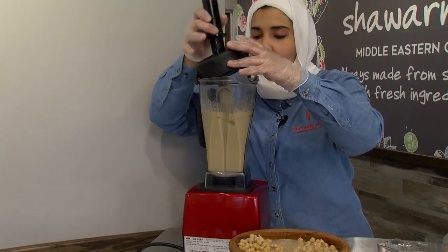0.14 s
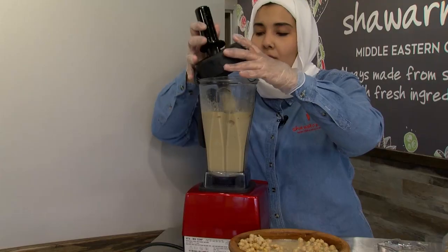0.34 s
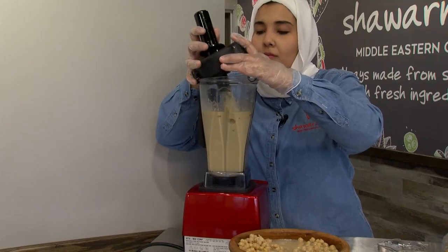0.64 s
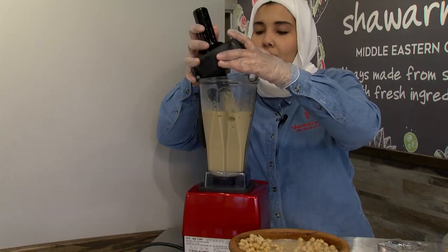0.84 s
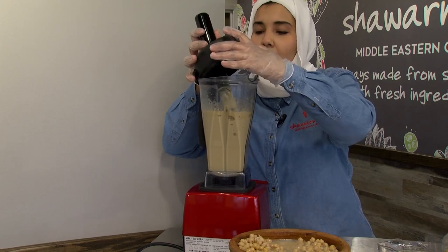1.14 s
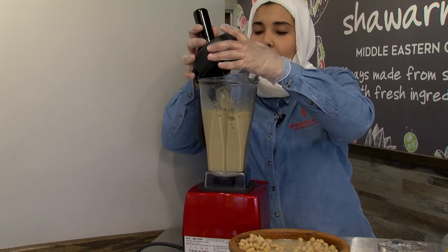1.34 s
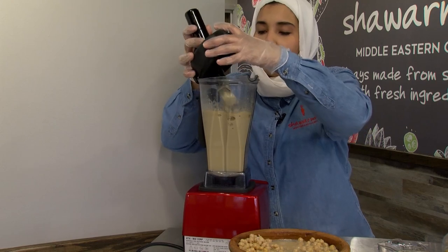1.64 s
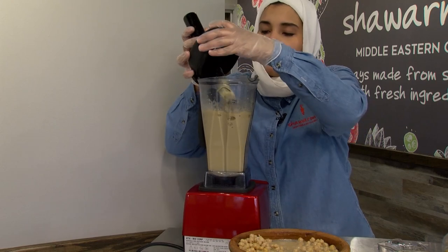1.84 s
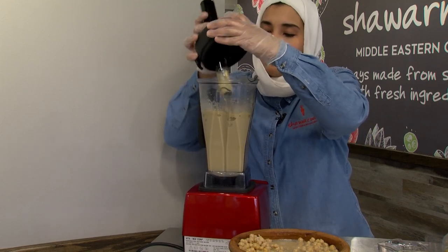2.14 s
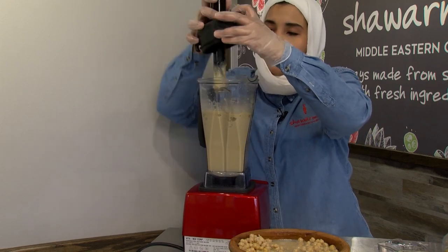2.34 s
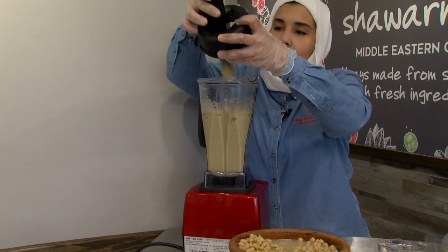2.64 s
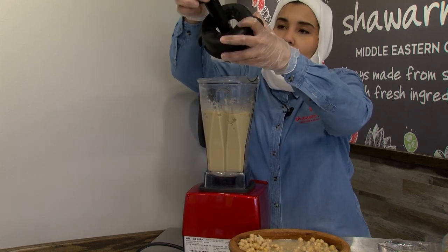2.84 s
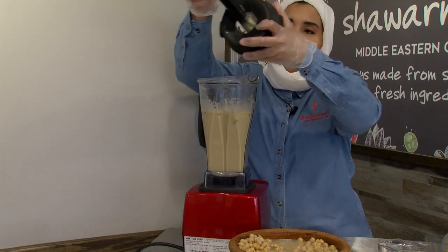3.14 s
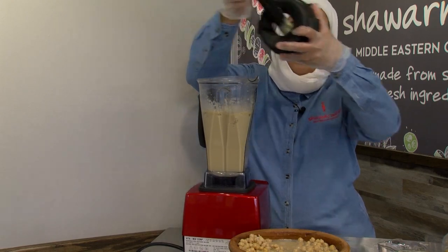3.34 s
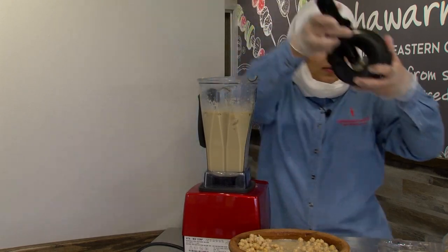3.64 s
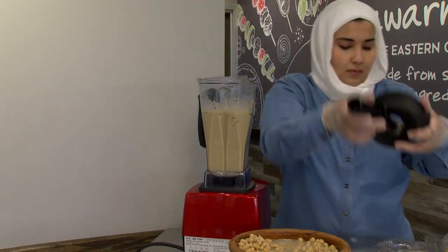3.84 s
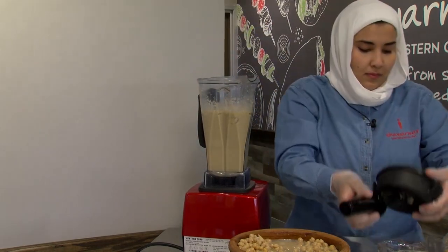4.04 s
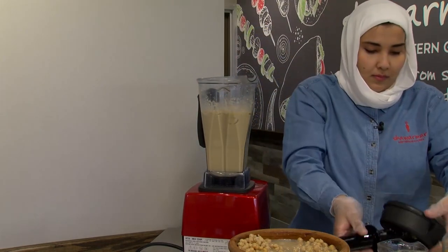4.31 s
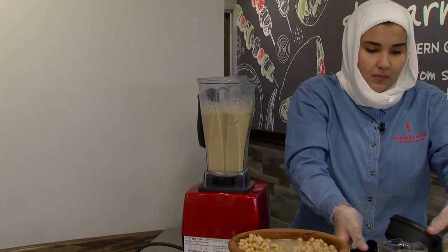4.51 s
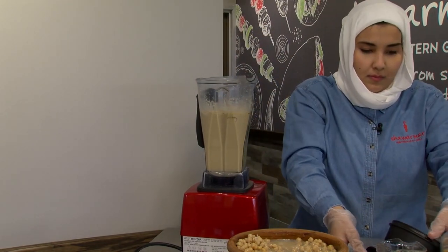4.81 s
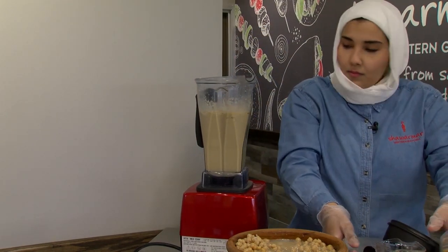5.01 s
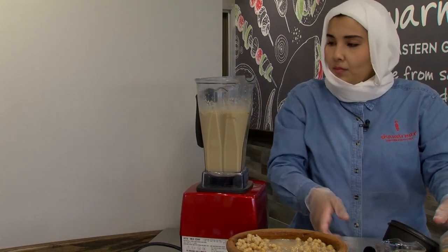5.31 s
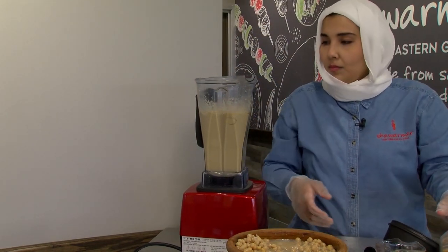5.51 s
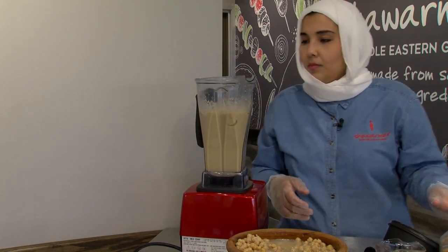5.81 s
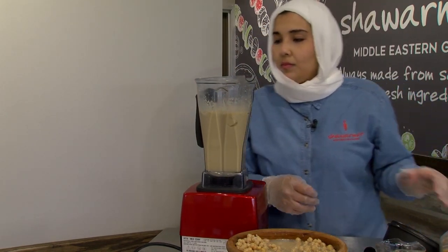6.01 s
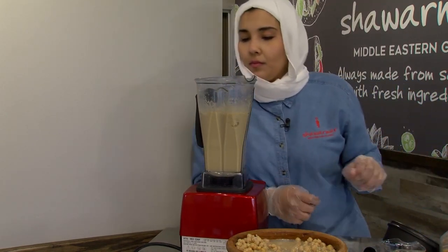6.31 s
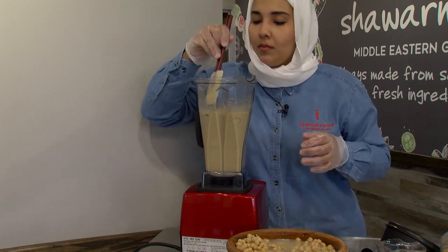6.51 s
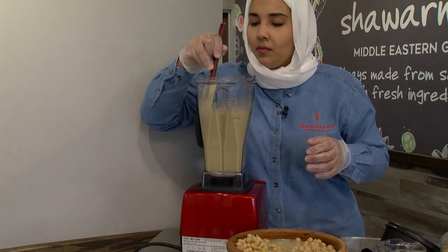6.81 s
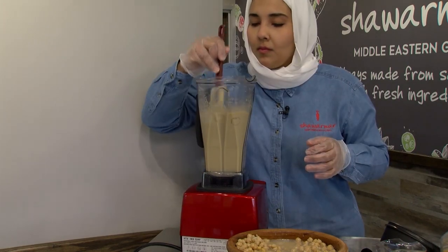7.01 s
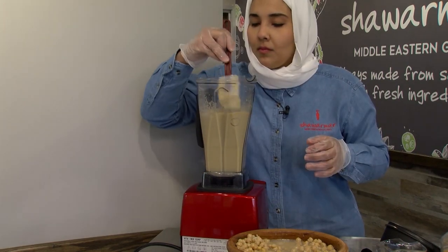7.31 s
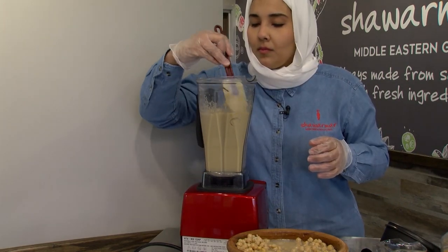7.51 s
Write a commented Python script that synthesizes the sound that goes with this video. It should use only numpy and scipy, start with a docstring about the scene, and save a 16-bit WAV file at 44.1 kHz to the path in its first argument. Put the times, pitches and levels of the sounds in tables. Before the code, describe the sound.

A powerful countertop blender whines steadily while thick paste churns and hisses; the lid comes off and a spatula dips in.

```python
"""In a kitchen, a countertop blender runs at steady speed; its lid is lifted off and a spatula dips in.
The four-winged blade sings at four times the shaft speed, made of sines that waver.
The churning paste is shaped noise: it hisses in surges and makes the air above it ring, higher with the lid off.
The base rumbles, the jar gives hollow notes, and there are a few ticks and soft thumps.
All is heard by a small microphone on a moving chest."""
import sys
import numpy as np
from scipy import signal
from scipy.fft import rfft, irfft
from scipy.io import wavfile

SR = 44100
rng = np.random.default_rng(int(sys.argv[2]) if len(sys.argv) > 2 else 0)


def persist_wave(psi):
    """Save psi, clipped to +-1, as 16-bit WAV."""
    counts = np.round(np.clip(psi, -1, 1) * 32767).astype(np.int16)
    wavfile.write(sys.argv[1], SR, np.atleast_2d(counts).T)


N = 337788

# Settings with four values mean: lid on, lid off, spatula in, spatula deep.
# Levels "over the churn" are added to the churn level. Drift rates are the corners of its low-passes.

# the hands: lid starts to tilt, is clear of the jar; spatula enters, is in [s]
LID_LIFT_S, SPATULA_IN_S = (1.57, 2.8), (6.4, 6.65)
SPATULA_DIP_S = (6.93, 7.1, 7.2, 7.45)   # it reaches down once: sets off, arrives, turns back, is up again

# how far the microphone is turned to the motor base: (time [s], share [0-1])
FACING_BY_TIME = [(0, .35), (1.1, 0.31), (1.6, 0.17), (2.0, 0.05), (2.6, 0.4), (3.35, 0.36), (3.7, 0.7),
                  (4.4, 0.72), (5.0, 0.9), (5.65, 0.64), (5.85, 0.8), (6.4, 0.63), (6.8, 0.33),
                  (7.66, 0.55)]
MIC_HISS_DB, CUTOFF_HZ = -63, 15730

# rumble of the base: (frequency [Hz], relative level [dB per Hz])
DEEP_SPECTRUM = [(12, -18), (20, 10), (38, 4.5), (60, 0), (85, -11.5), (110, -29.5)]
# growl of the base: (frequency [Hz], relative level [dB per Hz])
GROWL_SPECTRUM = [(80, -19.5), (130, -20), (210, -5), (260, -10.5), (310, 1), (420, -2), (520, -25)]
# rows deep, lower boom, upper boom, growl, with the microphone turned away; growl is before its lift:
# (lid on [dB], lid off [dB], spatula in [dB], spatula deep [dB])
RUMBLE_LEVELS = [(-52.5, -54, -51.5, -59), (-57.5, -54.5, -53.5, -59.5), (-47.5, -59.5, -42.5, -46.5),
                 (-44.5, -44, -43, -45.5)]
RUMBLE_FACING_DB = (11, 11.5, 5.2, 5.5)   # change when fully turned, same four layers
RUMBLE_WAVER_DB = (1.2, 1.7, 3.4, 2.4)    # random waver, same four layers
GROWL_LIFT_DB = 5.5
BOOM_HZ, BOOM_WIDTH_HZ = (119.2, 139.7), 16

# hollow notes of the jar, before a shared cut: (time [s], low note [dB], high note [dB])
HOLLOW_LEVELS = [(0, -20, -42), (.6, -11.5, -40), (.95, -16.5, -46), (1.3, -17, -41), (2.05, -20, -42),
                 (2.4, -20.5, -16.5), (2.9, -21, -25), (3.6, -25.5, -42), (4.8, -28, -44),
                 (5.5, -25.5, -31), (6.4, -27, -23.5), (7.0, -24, -25.5), (7.66, -24.5, -24)]
HOLLOW_HZ, HOLLOW_WIDTH_HZ = (524.9, 808), (43.7, 280)
HOLLOW_CUT_DB, HOLLOW_WAVER_DB = 5.5, 1

# soft low thumps: (time [s], peak level [dB])
THUMP_EVENTS = [(2.622, -27), (6.57, -33)]
# hard ticks: (time [s], level before the band filter [dB], lowest frequency [Hz], highest frequency [Hz])
TICK_EVENTS = [(4.1955, -20, 3000, 12000), (7.0655, -21, 1800, 10000), (7.0715, -20, 1800, 10000),
               (7.087, -23, 1800, 10000), (7.0905, -25, 1800, 10000)]

# droplets flung at the wall: (frequency [Hz], relative level [dB per Hz])
SPATTER_SPECTRUM = [(1500, -20.5), (3000, -2.5), (8000, -8.5), (12000, -5.5), (16500, -15.5)]
SPATTER_PER_S, SPATTER_DB = 180, (-26.5, -28.5, -32, -29)   # average count; level over the churn

# fine bright spray: (frequency [Hz], relative level [dB per Hz])
SPRAY_SPECTRUM = [(2000, -18), (4000, -5), (5500, -7), (7500, -11), (9000, -17.5), (11000, -21),
                  (13000, -26.5), (14500, -29.5), (16500, -36.5)]
# the treble as the microphone turns:
# (time [s], spray over the churn [dB], sheen centre [Hz], sheen width [Hz], sheen over the churn [dB])
TREBLE_BY_TIME = [(0, -8, 9030, 4040, -23.5), (1.8, -9, 8930, 3930, -23.5), (2.5, -9.5, 8700, 4000, -27),
                  (3.45, -9, 8730, 4030, -26), (3.7, -7.5, 11200, 4920, -20), (3.9, -10, 9860, 3950, -28),
                  (4.1, -7, 10800, 4030, -23), (5.1, -6.5, 11000, 4000, -25), (5.8, -6, 9900, 3100, -24),
                  (6.3, -8, 9470, 2560, -34.5), (6.6, -9.5, 8950, 2010, -31.5),
                  (7.66, -11, 8920, 1980, -27)]

# rings of the air column: levels over the churn, the first one before its low cut
FIRST_HZ, FIRST_DB = (527, 714, 680, 676), (11.8, 13.64, 18.3, 15.2)
COLUMN_WIDTH_HZ, COLUMN_CUT_HZ = 295, 479
OVERTONE_HZ, OVERTONE_WIDTH_HZ = (1564, 1715, 1690, 1448), (288, 191, 169, 150)
UPPER_LOW_HZ, UPPER_LOW_DB = (2020, 2487, 2440, 2500), (-21, -6, -15.5, -15)
UPPER_HIGH_HZ, UPPER_HIGH_DB = (2590, 2900, 4400, 4350), (-11.5, -16, -8.5, -11.5)
UPPER_WIDTH_HZ = (540, 1050)
# the column's overtone: (time [s], level over the churn [dB])
OVERTONE_LEVELS = [(0, 10), (1.5, 8), (2.3, 2), (2.6, -5.5), (3, -8), (3.5, 1), (4.4, -2), (5.2, 1.5),
                   (6.35, 3), (6.7, -1.5), (7.15, 5.5), (7.66, 1.5)]

# paste surging round the vortex, before quick random surges: (time [s], churn level [dB])
CHURN_LEVELS = [(0.0, -31.5), (0.62, -30.5), (1.56, -29), (1.58, -32.5), (2.13, -31.5), (2.2, -33),
                (2.37, -31), (2.52, -34.5), (2.88, -33), (2.94, -37.5), (3.18, -32), (3.26, -35),
                (3.86, -31), (3.9, -35.5), (3.97, -32), (4.78, -29.5), (4.8, -33.5), (4.91, -32),
                (5.01, -28.5), (5.35, -33.5), (5.55, -30.5), (5.61, -35), (5.76, -31.5), (6.38, -31.5),
                (6.74, -36), (6.76, -35), (7.57, -36.5), (7.66, -37)]
SURGE_DB, SURGE_RATE_HZ = 0.71, 5.1   # spread and drift rate of the quick surges
# hiss of the paste: (frequency [Hz], relative level [dB per Hz])
PASTE_SPECTRUM = [(300, -32), (450, -5), (520, 6.5), (1100, 0.5), (1400, -3), (2000, -5.5), (3000, -12.5),
                  (4500, -25.5), (7000, -58)]
HISS_DB = 8.5   # over the churn

# shaft speed before its random flutter: (time [s], speed [turns per s])
SHAFT_SPEED = [(0, 168.0), (.5, 168.9), (1.25, 167.8), (1.5, 168.3), (1.75, 167.7), (2.0, 168.4),
               (2.5, 168.7), (2.8, 170.4), (4.0, 171.1), (4.25, 169.6), (4.5, 170.8), (5.25, 171.9),
               (5.75, 171.9), (6.25, 170.0), (6.6, 169.0), (7.0, 168.8), (7.66, 167.6)]
FLUTTER_TURNS_PER_S, FLUTTER_RATE_HZ = 0.42, 9.4
# blade tone, four times the shaft speed, before waver: (time [s], level [dB])
BLADE_LEVELS = [(0.0, -10), (0.08, -16), (0.15, -10.5), (0.59, -14.5), (0.85, -11), (2.15, -11),
                (2.18, -14.5), (2.43, -8), (2.52, -14), (2.67, -9), (2.73, -14.5), (2.9, -10), (2.96, -15),
                (3.11, -12.5), (3.52, -12), (3.58, -15.5), (3.67, -11.5), (4.82, -12), (4.84, -17.5),
                (5.08, -10), (5.35, -11.5), (5.57, -11), (5.61, -15), (5.76, -11.5), (6.55, -10.5),
                (6.61, -8), (7.64, -8.5), (7.66, -10)]
LUMP_DB, LUMP_RATE_HZ = (0.66, 1.77, .8, 0.68), 14.6   # the load on the blade comes and goes
# weaker even orders, before waver: (time [s], 2nd order [dB], 6th order [dB], 8th order [dB])
EVEN_ORDER_LEVELS = [(0, -40, -39, -48), (.13, -32.5, -27, -34), (.75, -29, -24, -35),
                     (1.2, -36.5, -28.5, -50), (1.85, -51, -28.5, -58), (2.05, -46, -25.5, -58),
                     (2.7, -40, -34, -61), (3.35, -37.5, -27, -39), (3.75, -30.5, -31.5, -43),
                     (4.0, -40.5, -30, -37), (4.8, -45.5, -39, -38), (5.0, -32, -30, -33),
                     (5.6, -49, -38, -51), (5.8, -30.5, -24.5, -51), (6.3, -30.5, -27, -31.5),
                     (6.5, -38, -32, -32.5), (6.8, -36.5, -30, -41.5), (7.25, -41, -27.5, -39),
                     (7.66, -41.5, -38, -54)]
# level turned away, change when fully turned [dB]
FIRST_ORDER_DB, FOURTEENTH_ORDER_DB = (-49, 20.5), (-54.5, 11.5)


def from_db(db):
    """Gain of a level in dB."""
    return 10 ** (np.asarray(db) / 20)


def rms_one(x):
    """Scale a sound to rms 1."""
    return x / np.sqrt(np.mean(x ** 2) + 1e-20)


def in_time(rows):
    """Join the points of each table column by straight lines, one value per sample."""
    s, *columns = np.transpose(rows)
    return [np.interp(np.arange(N) / SR, s, c) for c in columns]


def drift(rate_hz):
    """Slow chance: noise at every 20th sample through two equal one-pole low-passes; spread 1."""
    r = np.exp(-40 * np.pi * rate_hz / SR)
    noise = rng.standard_normal(N // 20 + 2002)
    slow = signal.lfilter([1], [1, -2 * r, r * r], noise)[2000:]   # drop the filter's start
    return np.interp(np.arange(N) / 20, np.arange(len(slow)), rms_one(slow - slow.mean()))


def coloured(x, spectrum):
    """Shape a sound by a table of frequencies and levels, next to nothing beyond its ends; rms 1."""
    hz, level_db = np.transpose(spectrum)
    bins_hz = np.arange(1, N // 2 + 2) * SR / N
    gain = from_db(np.interp(np.log(bins_hz), np.log(hz), level_db, -99, -99))
    return rms_one(irfft(rfft(x) * gain, N))


def resonate(x, hz, width_hz):
    """Two equal resonances in a row whose centre and width may move, in blocks of 128 samples; rms 1."""
    r = np.exp(-np.pi * width_hz * np.ones(N) / SR)
    bend = -2 * r * np.cos(2 * np.pi * hz / SR)
    out, state = np.zeros(N), np.zeros((2, 2))
    for i in range(0, N, 128):
        stage = [1, 0, -1, 1, bend[i], r[i] ** 2]
        out[i:i + 128], state = signal.sosfilt([stage, stage], x[i:i + 128], zi=state)
    return rms_one(out)


def ringing(hz, width_hz):
    """Noise in one steady, steep resonance; rms 1."""
    band = signal.butter(2, [hz - width_hz / 2, hz + width_hz / 2], "band", fs=SR, output="sos")
    return rms_one(signal.sosfilt(band, rng.standard_normal(N)))


def by_jar(values):
    """A quantity with the lid on, lid off, spatula in and spatula deep, blended as the hands move."""
    s = np.arange(N) / SR
    lid_off = np.interp(s, LID_LIFT_S, (0, 1))
    spatula_in = np.interp(s, SPATULA_IN_S, (0, 1))
    deep = np.interp(s, SPATULA_DIP_S, (0, 1, 1, 0))
    return values[0] + np.diff(values) @ np.array([lid_off, spatula_in, deep])


def by_facing(away_db, change_db):
    """A level that follows the turn of the microphone."""
    return away_db + change_db * in_time(FACING_BY_TIME)[0]


def base_rumble():
    """The motor base passes rumble, two booms and a growl into the counter: noise in low bands."""
    deep_db, lower_db, upper_db, growl_db = [
        by_facing(by_jar(db), change_db) + waver_db * drift(3.7)
        for db, change_db, waver_db in zip(RUMBLE_LEVELS, RUMBLE_FACING_DB, RUMBLE_WAVER_DB)]
    lower_boom = from_db(lower_db) * ringing(BOOM_HZ[0], BOOM_WIDTH_HZ)
    upper_boom = from_db(upper_db) * ringing(BOOM_HZ[1], BOOM_WIDTH_HZ)
    deep = from_db(deep_db) * coloured(rng.standard_normal(N), DEEP_SPECTRUM)
    growl = from_db(growl_db + GROWL_LIFT_DB) * coloured(rng.standard_normal(N), GROWL_SPECTRUM)
    return deep + lower_boom + upper_boom + growl


def jar_notes():
    """The jar's two hollow notes: noise in resonances whose levels waver."""
    out = 0
    for db, hz, width_hz in zip(in_time(HOLLOW_LEVELS), HOLLOW_HZ, HOLLOW_WIDTH_HZ):
        level_db = db + HOLLOW_WAVER_DB * drift(3.6) - HOLLOW_CUT_DB
        out += from_db(level_db) * ringing(hz, width_hz)
    return out


def thumps():
    """Soft thumps, each one smooth push of pressure."""
    out, push = np.zeros(N), np.hanning(round(.009 * SR))   # 9 ms long
    for s, level_db in THUMP_EVENTS:
        out[round(s * SR):][:len(push)] += from_db(level_db) * push
    return out


def ticks():
    """Hard clicks, each with a short dying rattle of noise, kept to a band."""
    out, age_s = np.zeros(N), np.arange(800) / SR
    for s, level_db, low_hz, high_hz in TICK_EVENTS:
        burst = rng.standard_normal(len(age_s)) * 0.39 * np.exp(-age_s / 0.0024)
        burst[0] = 1   # the click itself
        band = signal.butter(2, [low_hz, high_hz], "band", fs=SR, output="sos")
        out[round(s * SR):][:len(age_s)] += from_db(level_db) * signal.sosfilt(band, burst)
    return out


def turbulence(angle, flicker_db):
    """White noise that flickers with the splashes and throbs with the turning shaft."""
    throb = 1 + 0.048 * np.cos(angle) + 0.066 * np.cos(2 * angle)
    flicker = from_db(flicker_db * (drift(35.0) + 0.6 * drift(130.0)))
    return rng.standard_normal(N) * throb * flicker


def spatter():
    """Droplets hit the jar wall at random as tiny clicks of uneven size."""
    sizes = from_db(3.0 * np.minimum(rng.exponential(1, N), 4)) * rng.choice([-1, 1], N)
    hits = sizes * (rng.random(N) < SPATTER_PER_S / SR)
    return from_db(by_jar(SPATTER_DB)) * coloured(hits, SPATTER_SPECTRUM)


def spray(splash):
    """Fine bright hiss; its sheen, a moving resonance, cancels the hiss just below and leaves a dip there."""
    spray_db, sheen_hz, width_hz, sheen_db = in_time(TREBLE_BY_TIME)
    hiss = from_db(spray_db) * coloured(splash, SPRAY_SPECTRUM)
    sheen = from_db(sheen_db) * resonate(splash, sheen_hz, width_hz)
    return hiss + sheen


def air_column(stir):
    """The air over the paste rings at its first mode, cut steeply below, and at higher ones."""
    low_cut = signal.butter(8, COLUMN_CUT_HZ, "high", fs=SR, output="sos")
    first = signal.sosfilt(low_cut, resonate(stir, by_jar(FIRST_HZ), COLUMN_WIDTH_HZ))
    overtone = resonate(stir, by_jar(OVERTONE_HZ), by_jar(OVERTONE_WIDTH_HZ))
    upper_low = resonate(stir, by_jar(UPPER_LOW_HZ), UPPER_WIDTH_HZ[0])
    upper_high = resonate(stir, by_jar(UPPER_HIGH_HZ), UPPER_WIDTH_HZ[1])
    return (from_db(by_jar(FIRST_DB)) * first
            + from_db(in_time(OVERTONE_LEVELS)[0]) * overtone
            + from_db(by_jar(UPPER_LOW_DB)) * upper_low
            + from_db(by_jar(UPPER_HIGH_DB)) * upper_high)


def paste(angle):
    """Churning hiss, spray, spatter and ringing air all swell with the surges."""
    hiss = from_db(HISS_DB) * coloured(turbulence(angle, flicker_db=1.07), PASTE_SPECTRUM)
    bright = spray(turbulence(angle, flicker_db=0.94)) + spatter()
    ringing_air = air_column(turbulence(angle, flicker_db=0.66))
    churn_db = in_time(CHURN_LEVELS)[0] + SURGE_DB * drift(SURGE_RATE_HZ)
    return from_db(churn_db) * (hiss + bright + ringing_air)


def shaft_angle(turns_per_s):
    """Angle of the shaft in radians; the load makes the speed flutter a little."""
    return 2 * np.pi * np.cumsum(turns_per_s + FLUTTER_TURNS_PER_S * drift(FLUTTER_RATE_HZ)) / SR


def motor_tones(angle):
    """Orders (multiples) of the shaft speed as sines, wavering in strength and phase as lumps meet the blade."""
    second_db, sixth_db, eighth_db = in_time(EVEN_ORDER_LEVELS)
    blade_db = in_time(BLADE_LEVELS)[0] + by_jar(LUMP_DB) * drift(LUMP_RATE_HZ)
    first_db, fourteenth_db = by_facing(*FIRST_ORDER_DB), by_facing(*FOURTEENTH_ORDER_DB)
    # order, level [dB], waver of the level [dB], waver of the phase [radians]
    tones = [(4, blade_db, 1.13, .2), (1, first_db, 1.9, .15), (2, second_db, 2.1, .25),
             (6, sixth_db, 3.65, .5), (8, eighth_db, 2.8, 1.1), (14, fourteenth_db, 3.5, 1.3)]
    out = 0
    for order, level_db, waver_db, slip in tones:
        strength = np.sqrt(2) * from_db(level_db + waver_db * drift(36.0))   # levels are rms
        out += strength * np.sin(order * angle + slip * drift(26.0))
    return out


def scene():
    """Base, jar, small knocks, paste and motor at one microphone."""
    angle = shaft_angle(in_time(SHAFT_SPEED)[0])
    background = base_rumble() + jar_notes() + thumps() + ticks()
    return (background + paste(angle) + motor_tones(angle))[None]


def record(dry):
    """The microphone adds its own faint hiss, peaks are rounded, the highest treble is cut."""
    heard = dry + from_db(MIC_HISS_DB) * rng.standard_normal(N)
    rounded = 1.2 * np.tanh(heard / 1.2)
    treble_cut = signal.ellip(14, .5, 80, CUTOFF_HZ, fs=SR, output="sos")
    return signal.sosfilt(treble_cut, rounded)


dry = scene()
out = record(dry)
persist_wave(out)
```